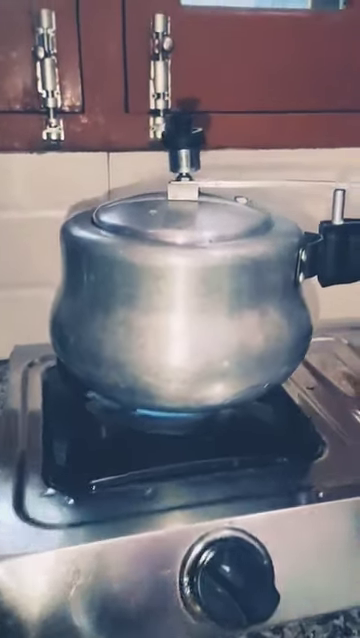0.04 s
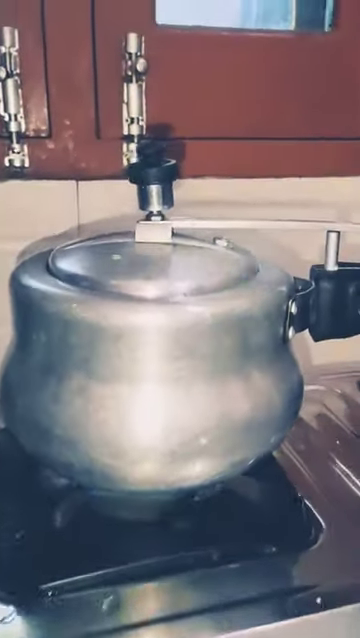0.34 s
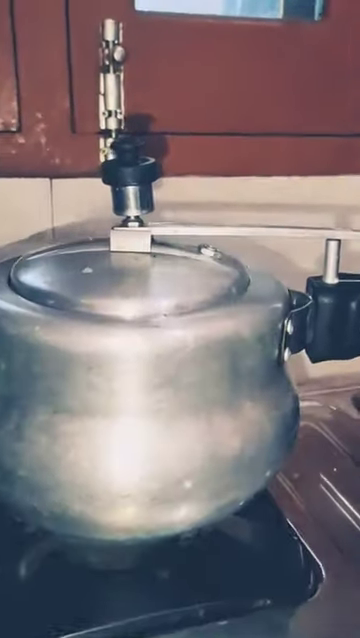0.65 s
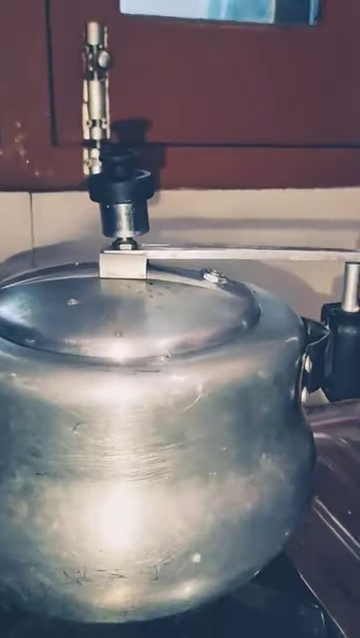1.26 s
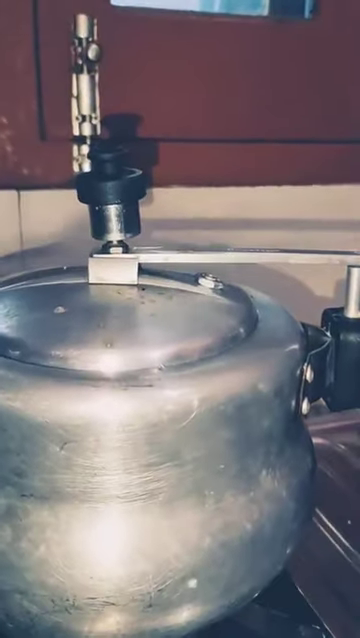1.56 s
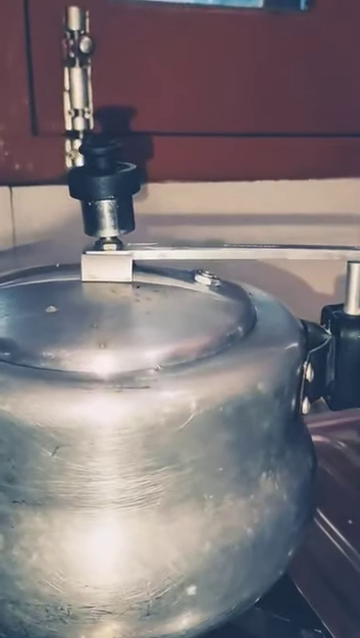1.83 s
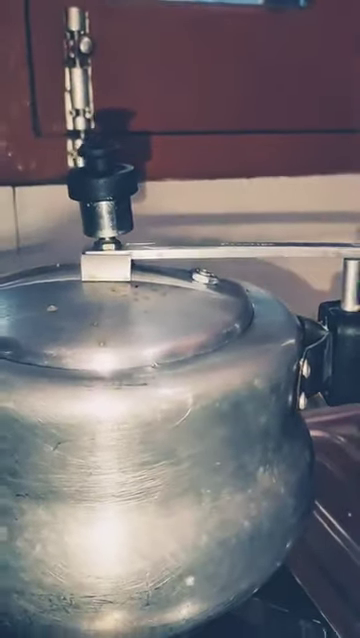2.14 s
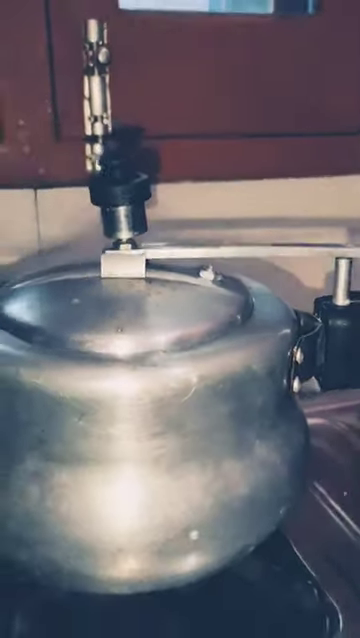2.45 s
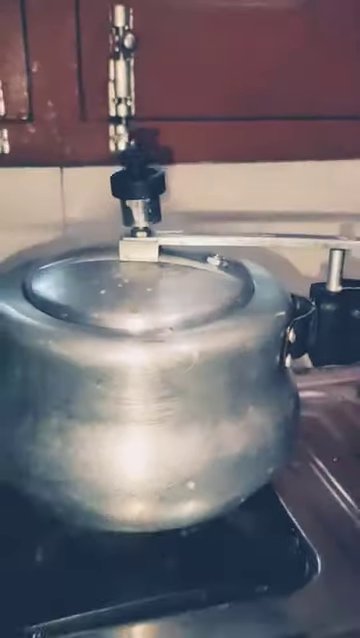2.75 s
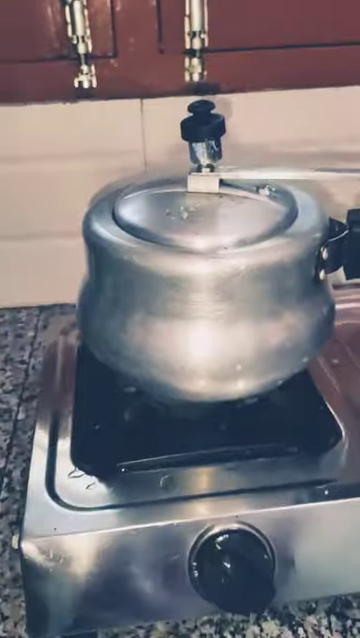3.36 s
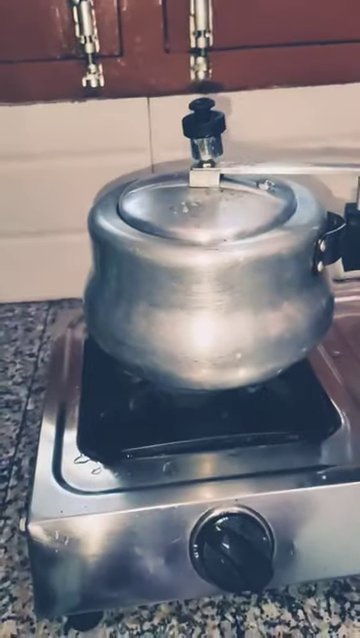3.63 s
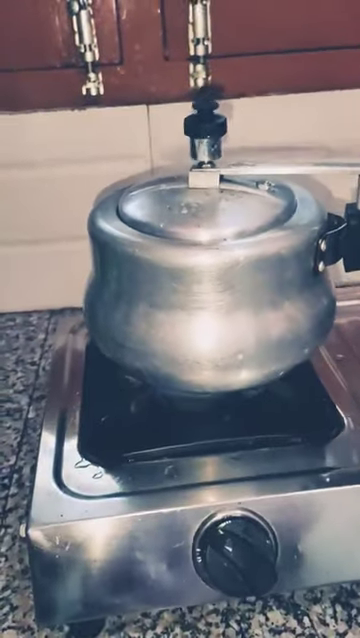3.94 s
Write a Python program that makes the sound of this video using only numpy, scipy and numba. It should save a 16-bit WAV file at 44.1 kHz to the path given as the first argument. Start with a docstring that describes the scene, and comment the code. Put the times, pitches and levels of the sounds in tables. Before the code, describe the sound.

A pressure cooker hisses steam continuously in a small kitchen, with a high breathy whistle. Moving air rumbles and thumps on the left of the microphone. Near the end the jet sputters briefly, with tiny squeaks.

```python
"""A pressure cooker vents steam under its weight valve in a small tiled kitchen.
The jet hisses over a lower rush and makes the valve gap ring in a breathy whistle.
Late on, the weight sinks and chokes the jet in short sputters, and the narrowed gap squeaks.
The phone that listens moves in and back out; mostly while it is close, moving air rumbles
and thumps on its left microphone."""
import sys
import numpy as np
from scipy import signal
from scipy.fft import rfft, irfft
from scipy.io import wavfile
from scipy.ndimage import map_coordinates
from numba import njit

SR = 44100
rng = np.random.default_rng(int(sys.argv[2]) if len(sys.argv) > 2 else 0)


def master_out(mix):
    """Clip the mix to full scale and print it as 16-bit PCM to the path in sys.argv[1]."""
    frames = np.transpose(np.atleast_2d(mix))
    ceiling = np.clip(frames, -1, 1)
    pcm = np.round(ceiling * 32767).astype(np.int16)
    wavfile.write(sys.argv[1], SR, pcm)


N = 176400
TIME, FREQS = np.arange(N) / SR, np.fft.rfftfreq(N, 1 / SR)

def undb(db):
    """Turn decibels into a gain."""
    return 10 ** (np.asarray(db) / 20)

def unit(x):
    """Scale to an average (rms) level of 1."""
    return x / np.sqrt(np.mean(x ** 2))

def curve(table):
    """Join a table's points in time with straight lines, one curve per value column."""
    times, *columns = np.array(table, float).T
    return np.array([np.interp(TIME, times, column) for column in columns])

def swell(middle, half_length):
    """A rounded bump in time, 1 at its middle."""
    return np.exp(-((TIME - middle) / half_length) ** 2)

def wobble(rate_hz):
    """A smooth random wobble, about 1 in size."""
    return unit(irfft(rfft(rng.standard_normal(N)) / (1 + (2 * FREQS / rate_hz) ** 2), N))

def noise(spectrum):
    """Noise whose lows and highs follow a table."""
    hz, db = np.array(spectrum, float).T
    gain = undb(np.interp(np.log(FREQS + 1), np.log(hz), db))
    return unit(irfft(rfft(rng.standard_normal(N)) * gain, N))

@njit
def resonate(x, hz, width_hz):
    """Keep only a band of sound around a pitch that can move."""
    out, band_state, low_state = np.empty(len(x)), 0., 0.
    for i in range(len(x)):
        tuning, damping = np.tan(np.pi * hz[i] / SR), width_hz / hz[i]
        band = (band_state + tuning * (x[i] - low_state)) / (1 + tuning * (tuning + damping))
        band_state = 2 * band - band_state
        low_state += 2 * tuning * band
        out[i] = damping * band
    return out

def pan(right_db):
    """Left and right gains that make the right side louder."""
    return undb(np.array([[-right_db], [right_db]]) / 2)

def at_mics(x, lag_s=.00017):
    """The direct sound reaches the right microphone just after the left."""
    return irfft(rfft(x) * np.exp(-2j * np.pi * FREQS * np.array([[0], [lag_s]])), N)

def in_kitchen(source, room_db):
    """Direct sound plus a wash of echoes from the tiles, room_db louder and different on each side."""
    direct = at_mics(source())
    echoes = np.array([source(), source()])
    return unit(direct + undb(room_db) * echoes)

def wall_ripple(x, depth_db, band_hz=55, rate_hz=5):
    """Echoes from nearby walls boost some pitches and dull others, shifting as the phone moves."""
    freqs, times, frames = signal.stft(x, SR, nperseg=2048)
    pattern = rng.standard_normal((1024, 128))
    places = np.meshgrid(freqs / band_hz, times * rate_hz, indexing="ij")
    gain = undb(depth_db * map_coordinates(pattern, places, order=3, mode="mirror"))
    rippled = signal.istft(frames * gain, SR)[1][:, :N]
    return unit(rippled) * np.std(x)

# How loud the steam flow makes the hiss (time [s], level [dB])
HISS_LEVEL = [(0, -29.5), (.66, -31), (.85, -34), (1.15, -31), (1.25, -34.5), (1.38, -30.5), (1.55, -33),
              (1.67, -31.5), (1.85, -32.5), (2.1, -29.5), (2.43, -32), (2.66, -31), (2.77, -26.5),
              (2.92, -31.5), (3.2, -27), (3.35, -29), (3.51, -28.5), (3.65, -28.5), (4, -29)]
# The tone colour of the hiss (frequency [Hz], level [dB])
HISS_SPECTRUM = [(100, -15.5), (1000, -9), (1900, -8.7), (2600, 0), (3900, 1.4), (4700, .5), (6500, -7),
                 (8200, -3), (10000, -2.5), (12500, -6), (14000, -9.5), (15500, -10)]
# Extra fullness in the middle of the hiss (time [s], boost [dB])
HISS_BODY = [(0, -1), (.7, 1.6), (2.6, 1), (3.2, -1.5), (4, 0)]
def hiss(choke_db, gain_db=7, body_hz=3780., body_width_hz=1500.):
    """Churning steam hisses, flutters under the rocking weight and thins as the phone draws back."""
    body = undb(curve(HISS_BODY)[0]) - 1

    def steam():
        bright = noise(HISS_SPECTRUM)
        return bright + body * resonate(bright, np.full(N, body_hz), body_width_hz)
    heard = wall_ripple(in_kitchen(steam, room_db=10.5), depth_db=.6, band_hz=298, rate_hz=4.02)
    flutter_db = .73 * wobble(rate_hz=22) + .24 * wobble(rate_hz=150)
    return heard * undb(curve(HISS_LEVEL) + gain_db + choke_db + flutter_db) * pan(right_db=.5)

# The tone colour of the rush (frequency [Hz], level [dB])
RUSH_SPECTRUM = [(20, 2), (45, 9.5), (110, 0), (210, 4), (400, -1.5), (700, 0), (1200, -1), (1800, -3.5),
                 (2700, -2.5), (5000, -13), (12000, -10.5)]
# How loud the rush is as the phone moves (time [s], left level [dB], right level [dB])
RUSH_LEVEL = [(0, -30.5, -23.5), (.8, -28, -24), (1.6, -27, -24), (2.3, -30, -26.5), (2.8, -29, -24.5),
              (3.2, -31, -23), (4, -37, -26)]
def rush(choke_db):
    """The jet's lower, fluttering rush beneath the hiss."""
    heard = in_kitchen(lambda: noise(RUSH_SPECTRUM), room_db=8)
    flutter_db = 1.33 * wobble(rate_hz=25.7)
    return heard * undb(curve(RUSH_LEVEL) + choke_db + flutter_db)

# Where the gap rings (pitch [Hz], filter width [Hz], level with weight up [dB], with weight down [dB])
GAP_RESONANCES = [(5230, 450, -5, -5.5), (5690, 290, -4.5, -4), (5937, 180, -6, -7.5),
                  (6410, 700, -3, -3.5), (6980, 770, -5, -6.5)]
def ring_gap(pitch_scale, sink_start_s=2.55, sink_length_s=.18):
    """Steam makes the valve gap ring at several pitches; their balance shifts as the weight sinks."""
    sunk = np.clip((TIME - sink_start_s) / sink_length_s, 0, 1)
    out = 0
    for hz, width_hz, up_db, down_db in GAP_RESONANCES:
        band = resonate(rng.standard_normal(N), hz * pitch_scale, float(width_hz))
        band = resonate(band, hz * pitch_scale, 2. * width_hz)  # a second pass trims the edges
        out = out + undb(up_db + sunk * (down_db - up_db)) * unit(band)
    return out

# How strongly the valve gap rings (time [s], level [dB])
WHISTLE_LEVEL = [(0, -31), (.65, -32), (.73, -28.5), (.81, -37.5), (.9, -31.5), (1.6, -33), (2.63, -31),
                 (2.74, -27.5), (2.92, -31), (3.05, -28.5), (3.36, -31), (3.395, -32), (3.44, -24),
                 (3.485, -27.5), (3.56, -32), (3.66, -28), (3.86, -27), (3.9, -34.5), (3.93, -26),
                 (3.958, -31), (3.977, -22.5), (4, -25)]
def whistle(gain_db=4.5):
    """The ringing gap gives a breathy whistle that wanders and flares as the weight wobbles."""
    pitch_scale = 1 + .017 * wobble(rate_hz=25)
    flicker_db = .65 * wobble(rate_hz=87)
    heard = wall_ripple(in_kitchen(lambda: ring_gap(pitch_scale), room_db=6), depth_db=3.3)
    return heard * undb(curve(WHISTLE_LEVEL) + gain_db + flicker_db) * pan(right_db=3.5)

# How strong the moving air is at the phone (time [s], level [dB])
DRAUGHT_LEVEL = [(0, -33), (.2, -31), (.28, -24.5), (.37, -32), (.62, -22), (.7, -29), (.9, -25),
                 (1.08, -28.5), (1.18, -23.5), (1.5, -22.5), (1.73, -19.5), (1.78, -28), (1.9, -21),
                 (2.37, -22.5), (2.5, -32), (2.6, -28), (2.72, -43), (3, -28), (3.1, -42), (3.45, -43),
                 (3.55, -28), (3.7, -54), (4, -40)]
# The tone colour of its rumble (frequency [Hz], level [dB])
DRAUGHT_SPECTRUM = [(10, -17), (30, 7), (55, -1.5), (105, -15), (190, -10.5), (350, -19), (700, -25.5),
                    (2000, -25), (6000, -73)]
def draught():
    """Swirls of air rumble on the microphone."""
    rumble = noise(DRAUGHT_SPECTRUM)
    swirl_db = 2.5 * wobble(rate_hz=260)
    return unit(rumble * undb(swirl_db)) * undb(curve(DRAUGHT_LEVEL)[0])

# Puffs of air that hit the phone (time [s], push or pull [relative pressure], fade time [s])
PUFFS = [(.046, -0.25, .015), (.285, -.23, 0.012), (0.301, 0.21, .015), (0.342, .18, 0.0025),
         (.389, 0.16, 0.016), (.449, 0.24, 0.018), (0.519, 0.032, 0.013), (0.649, -.27, 0.017),
         (0.734, -0.33, 0.0026), (.771, 0.43, .015), (.806, 0.6, 0.0065), (.869, 0.42, 0.0092),
         (.89, 0.43, .006), (.908, 0.26, .015), (0.946, -0.39, 0.0016), (0.982, 0.32, 0.0071),
         (1.034, 0.34, .015), (1.142, -0.31, .015), (1.199, .35, 0.014), (1.213, 0.35, 0.018),
         (1.359, 0.21, .015), (1.397, 0.24, .003), (1.46, 0.32, .015), (1.52, 0.27, .003),
         (1.534, 0.49, 0.0033), (1.583, -0.43, 0.0033), (1.628, 0.42, 0.0066), (1.721, -0.48, 0.013),
         (1.735, 0.26, .003), (1.828, 0.28, 0.0033), (1.857, 0.25, 0.014), (1.891, 0.45, 0.016),
         (1.921, 0.34, 0.014), (1.972, 0.37, 0.0021), (2.013, 0.24, .015), (2.119, -0.33, .003),
         (2.204, 0.47, 0.0025), (2.224, -.28, 0.014), (2.255, 0.45, 0.0042), (2.383, .36, .003),
         (2.398, -0.37, 0.0037), (2.571, 0.36, 0.02), (2.587, -0.31, 0.014), (2.638, -0.22, 0.018),
         (2.865, 0.35, .015), (2.975, -0.17, .015), (3.602, 0.23, .015)]
def thumps(rise_s=.00024, low_cut_hz=19):
    """Each strong puff is a sudden jump in pressure that leaks away."""
    pressure = np.zeros(N)
    for start, size, fade_s in PUFFS:
        age = np.clip(TIME - start, 0, 1)
        jump = (1 - np.exp(-age / rise_s)) * np.exp(-age / fade_s)
        pressure += size * jump / jump.max()
    return signal.sosfilt(signal.butter(2, low_cut_hz, "high", fs=SR, output="sos"), pressure)

# Moments when the weight sinks (middle time [s], half length [s], hiss change [dB], rush change [dB])
WEIGHT_DIPS = [(2.703, 0.032, -4.5, -17), (3.403, 0.05, -5.5, -15), (3.754, 0.024, -1, -5.5),
               (3.89, 0.042, -5, -13), (3.945, 0.016, -4, -8)]
def chokes():
    """The sinking weight blocks the jet: dips in dB, small for the hiss and deep for the rush."""
    hiss_db = rush_db = 0
    for middle, half_length, hiss_change, rush_change in WEIGHT_DIPS:
        dip = swell(middle, half_length)
        hiss_db += hiss_change * dip
        rush_db += rush_change * dip
    return hiss_db, rush_db

# Squeaks of the narrowed gap (middle time [s], half length [s], pitch [Hz], level [dB])
GAP_SQUEAKS = [(3.367, .008, 5670, -25), (3.437, .008, 5700, -30), (3.468, 0.014, 5600, -26),
               (3.926, .009, 5950, -29), (3.947, 0.0063, 5860, -27), (3.98, .018, 6030, -24)]
def squeaks():
    """Around a choke, the narrow gap locks briefly onto one unsteady tone."""
    pitch_scale = 1 + .023 * wobble(rate_hz=242)
    out = 0
    for middle, half_length, hz, db in GAP_SQUEAKS:
        tone = np.sqrt(2) * np.sin(2 * np.pi * np.cumsum(hz * pitch_scale) / SR)
        out += undb(db) * swell(middle, half_length) * tone
    return at_mics(out) * pan(right_db=3.5)

def scene():
    """The cooker on both sides, with moving air on the left microphone only."""
    hiss_choke_db, rush_choke_db = chokes()
    jet = wall_ripple(rush(rush_choke_db) + hiss(hiss_choke_db), depth_db=1.6)
    mix = jet + whistle() + squeaks()
    mix[0] += draught() + thumps()
    return mix

def record(dry, top_hz=15200):
    """The phone cuts off the highest treble."""
    return signal.sosfilt(signal.ellip(10, .2, 80, top_hz, fs=SR, output="sos"), dry)

dry = scene()
out = record(dry)
master_out(out)
```